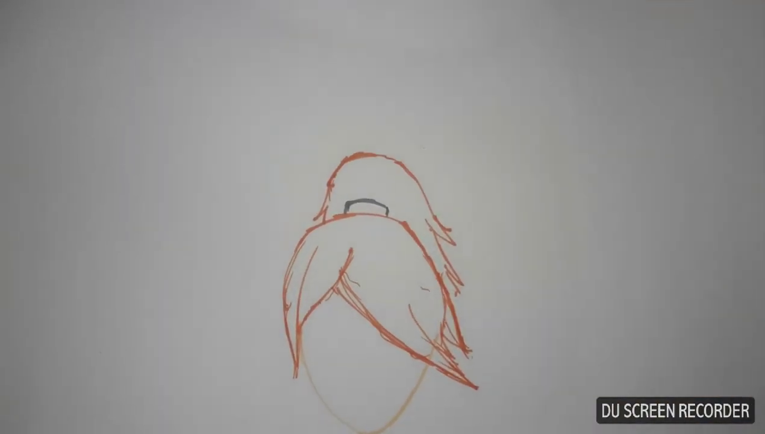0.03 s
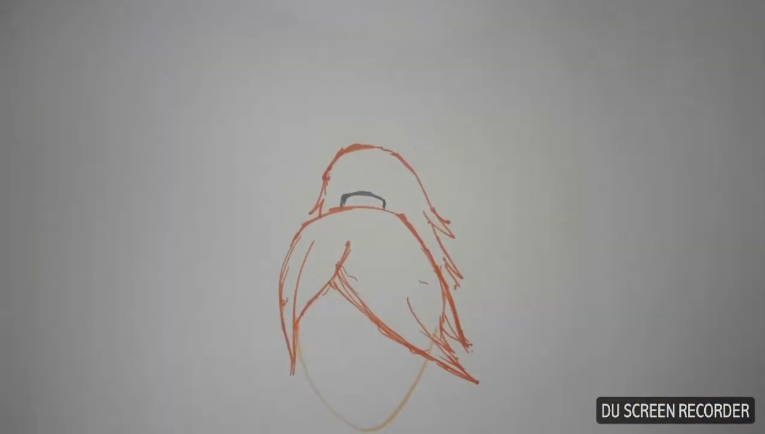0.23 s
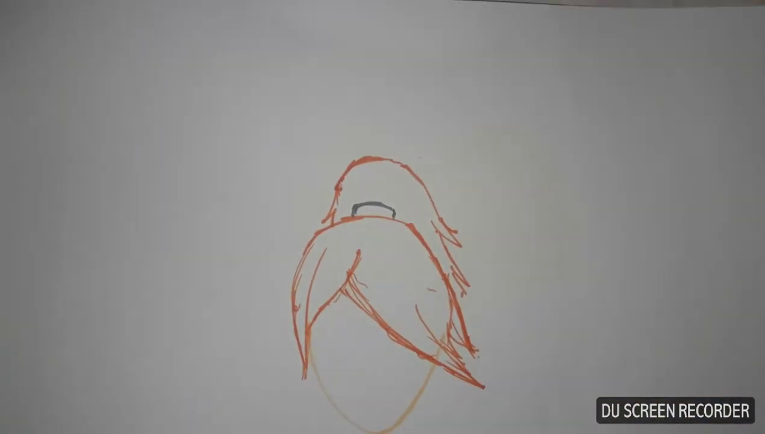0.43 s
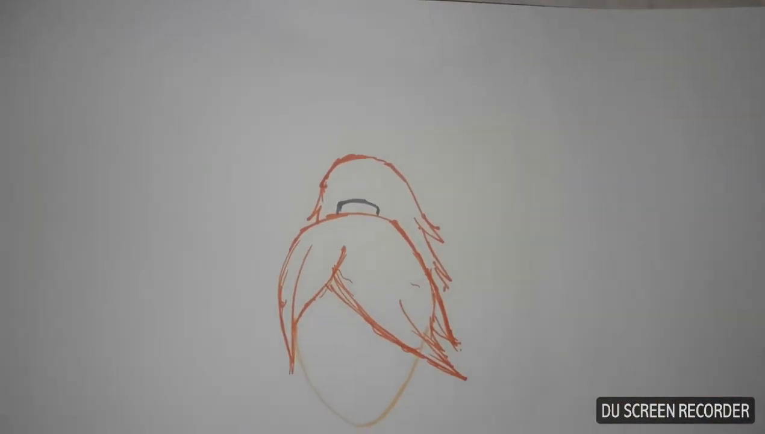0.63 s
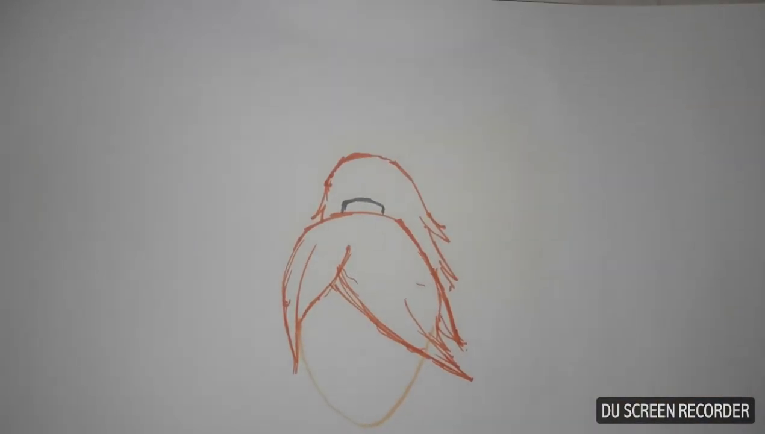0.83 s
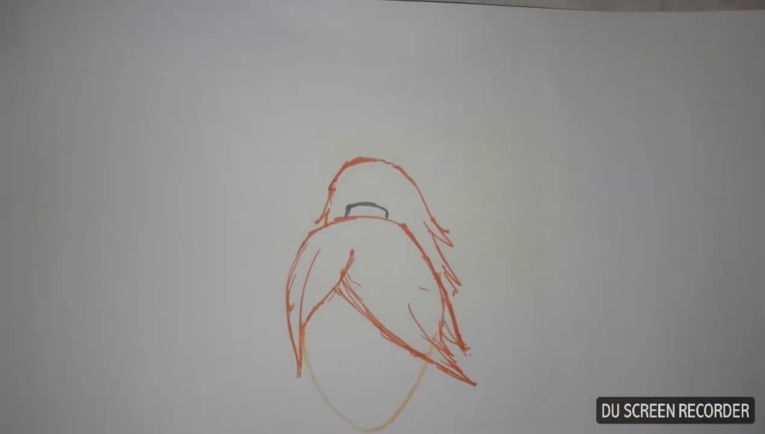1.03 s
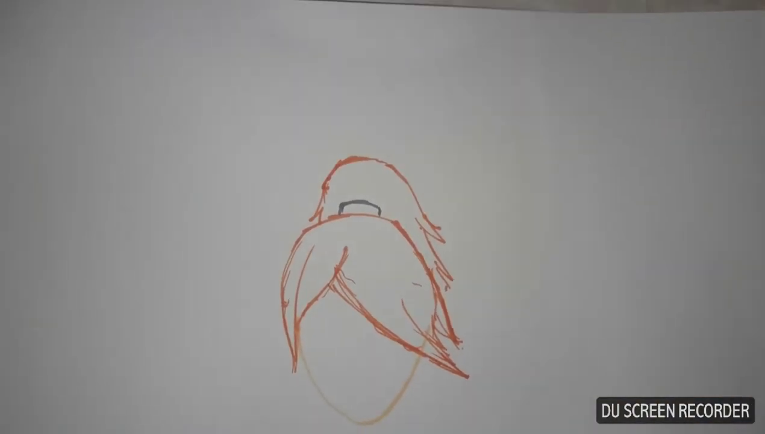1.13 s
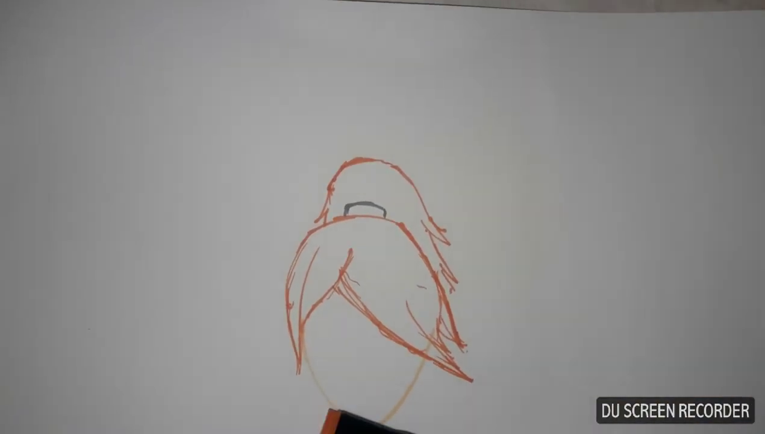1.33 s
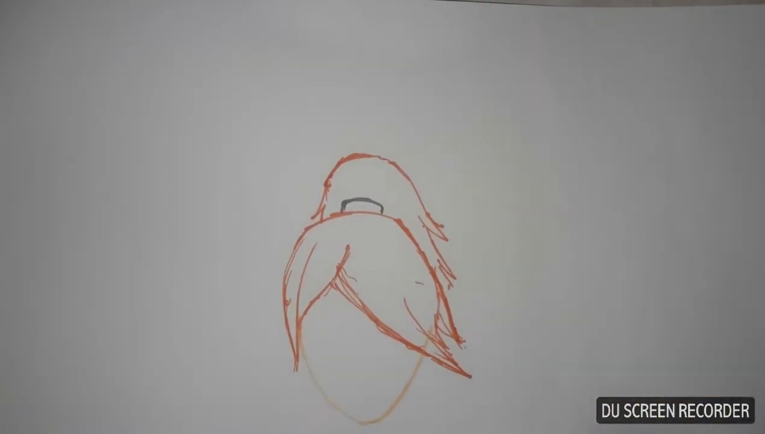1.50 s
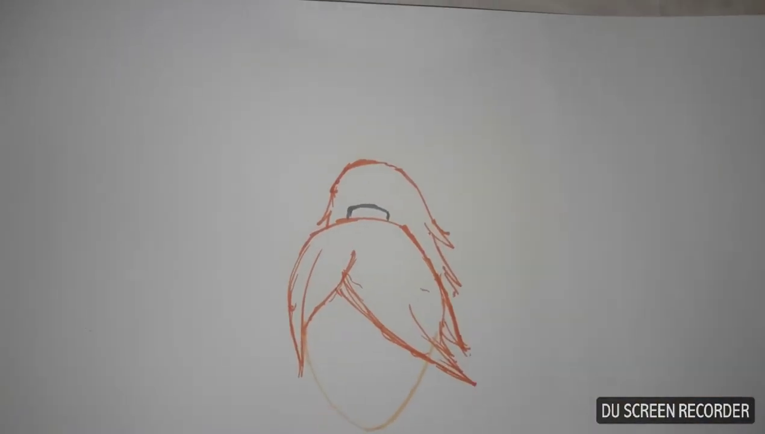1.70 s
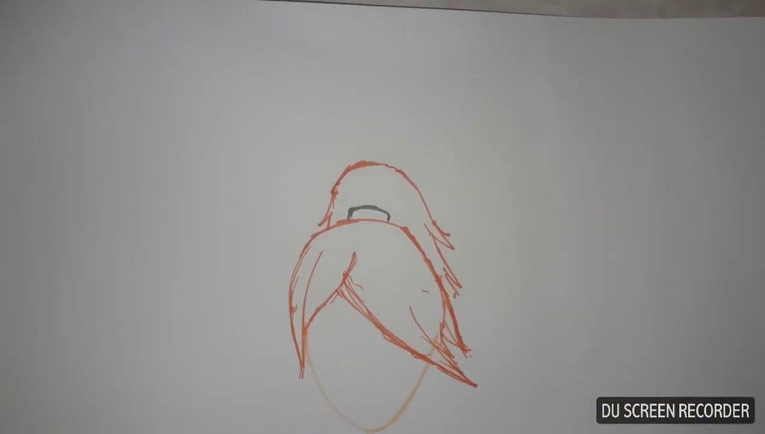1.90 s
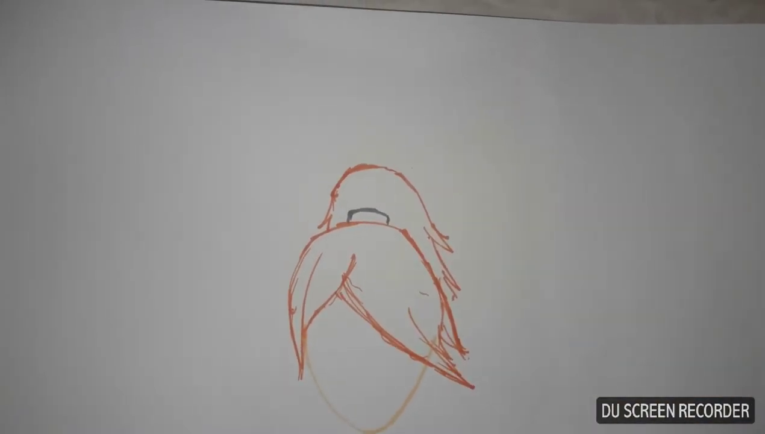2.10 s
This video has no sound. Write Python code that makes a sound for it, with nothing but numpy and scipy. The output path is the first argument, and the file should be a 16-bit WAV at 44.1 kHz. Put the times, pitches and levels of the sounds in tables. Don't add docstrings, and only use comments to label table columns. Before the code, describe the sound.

A small plastic part is handled close to a phone microphone at a desk. A soft tick at 0.12 s, then a loud, bright snap with a tiny rattle and desk thud at 0.24 s, ringing briefly in a small room. Background fan hiss dips, then recovers by 1 s. Two quieter knocks at 1.15 and 1.18 s, a tiny click at 1.23 s, and faint finger rubs and crackles throughout.

```python
import sys
import numpy as np
from scipy import signal
from scipy.io import wavfile
from scipy.ndimage import uniform_filter1d

SR = 44100
rng = np.random.default_rng(int(sys.argv[2]) if len(sys.argv) > 2 else 0)


def convert_level_to_amplitude(level_db):
    exponent = np.asarray(level_db, float) / 20
    return 10 ** exponent


def materialize(psi):
    bounded = np.clip(np.atleast_2d(psi).T, -1, 1)
    quanta = np.round(bounded * 32767).astype(np.int16)
    wavfile.write(sys.argv[1], SR, quanta)


N = 94815
EDGE_HZ = 16300


def evened(x):
    return x / np.sqrt(np.mean(x ** 2) + 1e-20)


def read(points, hz):
    f, value = np.transpose(points)
    return np.interp(np.log(hz + 1), np.log(f + 1), value)


def add(mix, s, sound):
    part = mix[round(s * SR):][:len(sound)]
    part += sound[:len(part)]


def ring(hz, width, rise_s=0.00012):
    t = np.arange(2000) / SR
    return (1 - np.exp(-t / rise_s)) * np.exp(-np.pi * width * t) * np.sin(2 * np.pi * hz * t)


# (time [s], level [dB], brightest pitch [Hz])
TICK_HITS = [
    (0.1186, -24, 8000),
    (0.1236, -37, 9000),
    (.1246, -37, 10000),
    (.1300, -48, 10000),
]
SNAP_HITS = [(.2360, -62, 11500), (.2382, -10, 7440), (.2386, -4, 7450), (.2387, -4, 14800),
             (0.2396, -14, 11000), (0.2406, -12, 5940), (.2412, -10, 4000), (0.2416, -10, 10500),
             (0.243, -18, 6000), (.2446, -11, 4400), (0.2476, -13, 12000), (0.2486, -12, 2700),
             (0.25, -18, 4000), (0.2547, -24, 4960), (.2580, -25, 9000), (.2592, -24, 2010),
             (.2650, -30, 6000), (.2742, -27, 6800), (.2747, -27, 13000), (.2456, -19, 2400),
             (.2620, -29, 3200)]
KNOCK_HITS = [
    (1.1455, -26, 9000),
    (1.1463, -28, 4000),
    (1.1470, -31, 1200),
    (1.1510, -42, 9000),
    (1.1488, -33, 2000),
]
REKNOCK_HITS = [
    (1.1765, -24, 8000),
    (1.1776, -25, 3700),
    (1.1786, -29, 1100),
    (1.1799, -28, 2500),
    (1.1805, -48, 12000),
]
# (pitch [Hz], width [Hz], level [dB])
TICK_RING = [(2360, 170, 7), (2900, 573, -2), (7900, 500, -14), (9340, 290, -10.5), (10700, 440, -1),
             (12900, 350, -13), (14600, 930, -1)]
SNAP_RING = [(780, 300, -16), (1200, 300, -31), (1700, 304, -13), (2350, 250, -16), (3100, 200, -10),
             (3830, 230, -5), (4550, 300, -11.5), (5820, 490, -7), (6950, 400, -2.5), (7480, 400, -2.5),
             (8800, 570, -8), (10300, 800, 1), (12500, 700, -6.5), (14680, 900, -4)]
KNOCK_RING = [(800, 350, -14), (1700, 340, -3), (2400, 460, -7), (4050, 250, 1), (5200, 680, -3),
              (6400, 900, -4), (9400, 1200, -19), (12800, 1200, 3), (14800, 1100, -6)]
REKNOCK_RING = [(550, 250, -16), (1100, 220, -9), (1750, 300, -4), (2500, 500, -5), (3700, 220, -1),
                (4860, 630, 0), (7300, 700, -10), (8780, 700, -29), (11500, 910, 1), (14000, 900, 1)]
# (crack level [dB], desk level [dB], room level [dB], rise [s] if unusual)
BALANCE = [
    (-12, -15, -19, .0004),
    (-1, -7, -7),
    (-3, -7, -14),
    (-3, -8, -15),
]


def small_part():
    hits = (TICK_HITS, SNAP_HITS, KNOCK_HITS, REKNOCK_HITS)
    rings = (TICK_RING, SNAP_RING, KNOCK_RING, REKNOCK_RING)
    return sum(contacts(*group) for group in zip(hits, rings, BALANCE))


RISE_S, CRACK_S = .00012, 0.00038
CRACK_SPREAD = 1.3
FOCUS_DB_PER_OCT2 = 3.5
ANSWER_DB, ANSWER_TOP = 9, 2.5


def contacts(rows, modes, levels):
    crack_db, desk_db, room_db, rise_s = (*levels, RISE_S)[:4]
    out, blows, t = np.zeros(N), np.zeros((2, N)), np.arange(256) / SR
    impulse = (t == 0).astype(float)
    luck = rng.standard_normal((len(rows), len(modes), 2))
    noise = rng.standard_normal((len(rows), 256))
    for k, (s, db, bright_hz) in enumerate(rows):
        for (hz, width, mode_db), (sign, tune) in zip(modes, luck[k]):
            octaves_squared = min(np.log2(hz / bright_hz) ** 2, 3)
            level = convert_level_to_amplitude(db + mode_db - FOCUS_DB_PER_OCT2 * octaves_squared)
            add(out, s, np.sign(sign) * level * ring(hz * (1 + 0.0096 * tune), width, rise_s))
        crack = convert_level_to_amplitude(db) * noise[k] * np.exp(-t / CRACK_S)
        edges = [bright_hz / CRACK_SPREAD, min(bright_hz * CRACK_SPREAD, EDGE_HZ)]
        add(out, s, convert_level_to_amplitude(crack_db) * signal.lfilter(*signal.butter(1, edges, "band", fs=SR), crack))
        dull = signal.butter(1, min(bright_hz * ANSWER_TOP, EDGE_HZ), fs=SR)
        add(blows[k % 2], s, convert_level_to_amplitude(db + ANSWER_DB) * signal.lfilter(*dull, impulse))
    for spot in blows:
        answer = desk_and_room(desk_db, room_db)
        out = out + below_edge(signal.fftconvolve(spot, answer)[:N])
    return out


# (time [s], level [dB], pitch [Hz], width [Hz])
THUDS = [(.1235, -43, 400, 60), (.2380, -19, 540, 330), (.2381, -22, 310, 70), (.2383, -18, 396, 85),
         (.2450, -31, 200, 60), (.2570, -22, 395, 90), (.2573, -25, 520, 170), (.2600, -33, 305, 35),
         (.2720, -41, 400, 30), (1.1456, -37, 400, 60), (1.1462, -43, 600, 200), (1.1768, -36, 380, 70),
         (1.1764, -39, 560, 200)]


def thuds():
    out = np.zeros(N)
    for s, db, hz, width in THUDS:
        add(out, s, convert_level_to_amplitude(db) * ring(hz, width, rise_s=.0006))
    return out


# (pitch [Hz], time [s])
ROOM_T60 = [(150, .2), (500, .18), (2000, .17), (6000, .16), (15000, .13)]
# (pitch [Hz], level [dB])
ROOM_COLOUR = [(80, -25), (200, -1), (380, 5), (800, -1), (1500, -4), (3000, 0), (4800, -4), (8000, -2),
               (12000, -7), (16000, -8)]
DESK_COLOUR = [(100, -39), (250, -12), (400, -6), (1000, -10), (2200, -2), (3800, 3.5), (8000, -9),
               (15000, -13)]
DESK_T60 = 0.047


def desk_and_room(desk_db, room_db):
    desk = tail(DESK_COLOUR, [(100, 10)])
    desk = desk * convert_level_to_amplitude(-60 * np.arange(SR // 2) / SR / DESK_T60)
    return convert_level_to_amplitude(room_db) * tail(ROOM_COLOUR, ROOM_T60) + convert_level_to_amplitude(desk_db) * desk / np.linalg.norm(desk)


def tail(colour, t60):
    hz, t, z = signal.stft(rng.standard_normal(SR // 2), SR, nperseg=256)
    z = z * convert_level_to_amplitude(read(colour, hz)[:, None] - 60 * t / read(t60, hz)[:, None])
    x = signal.istft(z, SR, nperseg=256)[1][:SR // 2]
    x = x * np.minimum(np.arange(len(x)) / (.001 * SR), 1)
    return x / np.linalg.norm(x)


# (time [s], length [s], level [dB], first pitch [Hz], last pitch [Hz], width [Hz])
RUBS = [
    (0.661, 0.028, -52.5, 11000, 9500, 6000),
    (0.574, 0.082, -60.5, 9400, 8000, 5000),
    (1.44, .16, -63, 6500, 10500, 2200),
    (2.5, 0.032, -52, 13000, 9300, 5000),
]


def rubs():
    out = np.zeros(N)
    for start, length, db, from_hz, to_hz, width in RUBS:
        u = np.linspace(0, 1, round(length * SR))
        glide_hz = from_hz + (to_hz - from_hz) * u
        turn = np.exp(2j * np.pi * np.cumsum(glide_hz) / SR)
        r = np.exp(-np.pi * width / SR)
        noise = rng.standard_normal(12000)[:len(u)]
        band = (turn * signal.lfilter([1], [1, -2 * r, r * r], noise / turn)).real
        add(out, start, convert_level_to_amplitude(db) * np.sin(np.pi * u ** 0.5) ** .8 * evened(band))
    return out


# (time [s], level [dB])
HANDLING = [(0, 0), (.3, 4), (.5, 5), (.65, 6), (0.741, -2), (0.831, 5.5), (0.951, 5.5), (1.3, 4), (1.5, 3),
            (1.56, 9.5), (1.65, 3.5), (1.73, -5), (1.8, 4.5), (1.99, 3), (2.03, 7.5), (2.15, 0)]
# (time [s], level [dB], pitch [Hz])
CRACKS = [(.6655, -54, 13500), (.799, -53, 11500), (.829, -58, 12000), (.843, -57, 12000),
          (.889, -56, 12500), (.916, -54, 10500), (.917, -52, 3000), (.956, -57, 12000), (.989, -51, 2800),
          (1.424, -47, 4000), (1.582, -54, 12000), (1.688, -56, 12000), (1.895, -56, 12000)]
# (time [s], level [dB], pitch [Hz])
BOUNCES = [
    (1.1588, -50, 11000),
    (1.1713, -46, 4500),
    (1.1715, -50, 10000),
    (1.218, -52, 10000),
    (1.2322, -40, 4700),
    (1.2322, -41, 14500),
    (1.2324, -50, 8000),
    (1.2322, -50, 11500),
]
CRACKLE_PER_S, CRACKLE_HZ, CRACKLE_DB = 140, 9220, -69


def crackle():
    size = convert_level_to_amplitude(1.9 * np.minimum(rng.exponential(1, N), 2)) * (rng.random(N) < CRACKLE_PER_S / SR)
    puffs = .35 + signal.oaconvolve(size, np.exp(-np.arange(400) / (.002 * SR)))[:N]
    treble = signal.butter(6, CRACKLE_HZ, "high", fs=SR, output="sos")
    out = evened(signal.sosfilt(treble, puffs * rng.standard_normal(N)))
    out = out * convert_level_to_amplitude(CRACKLE_DB + np.interp(np.arange(N) / SR, *np.transpose(HANDLING)))
    for s, db, hz in CRACKS + BOUNCES:
        tick = ring(hz, .05 * hz + 350, rise_s=.0003)
        add(out, s, convert_level_to_amplitude(db) * tick / tick.max())
    return out


# (pitch [Hz], level per Hz [dB])
FAN = [(40, -41.5), (100, -36.5), (180, -22), (210, -5), (500, -10.5), (850, -19), (1500, -13), (2300, -23)]
AIR = [(800, -40), (2300, -18), (3100, -20), (3900, -28), (5900, -35), (8900, -36.5), (9800, -35),
       (15500, -33.5)]
# (pitch [Hz], width [Hz], level [dB])
CASE = [(397.5, 184.5, -4), (1900, 300, -10), (4640, 550, -15.5), (7000, 910, -25.5), (10000, 650, -33.5)]
# (pitch [Hz], level [dB])
HUM = [(200, -68), (300, -70), (395, -69.5)]
FAN_DB = -50.5


def fan():
    frames, hz = N // 256 + 5, np.fft.rfftfreq(1024, 1 / SR)
    a, b, patches = rng.standard_normal((frames, 513, 3)).T
    patches = evened(uniform_filter1d(uniform_filter1d(patches, size=16, axis=0), size=10, axis=1))
    swell = evened(uniform_filter1d(rng.standard_normal(frames), size=12))
    power = np.where(hz < 2300, convert_level_to_amplitude(read(FAN, hz)) ** 2, convert_level_to_amplitude(read(AIR, hz)) ** 2)
    for f, width, db in CASE:
        power = power + convert_level_to_amplitude(db) ** 2 * np.exp(-((hz - f) / width) ** 2 * 2)
    z = (a + 1j * b) * np.sqrt(power)[:, None] * convert_level_to_amplitude(0.92 * patches + 1.6 * swell)
    hiss = evened(signal.istft(z, nperseg=1024, noverlap=768)[1][:N])
    t, hum = np.arange(N) / SR, np.zeros(N)
    for f, db in HUM:
        waver_db = 1 + 1.6 * np.sin(2 * np.pi * (3.1 * t + rng.random()))
        hum += convert_level_to_amplitude(db + waver_db) * np.sin(2 * np.pi * (f * t + rng.random()))
    return convert_level_to_amplitude(FAN_DB) * hiss + hum


HISS_EDGE_HZ = 15650


def below_edge(x):
    return signal.oaconvolve(x, signal.firwin(601, HISS_EDGE_HZ, window=("kaiser", 9), fs=SR), "same")


# (pitch [Hz], level [dB])
SIDE_COLOUR = [(30, -20), (250, -40), (700, -23), (2000, -28), (5000, -26), (9000, -16), (15000, -23)]
SIDE_PATCH_DB = 5


def side_hiss(floor):
    hz, t, z = signal.stft(floor, SR, nperseg=1024)
    patches = uniform_filter1d(rng.standard_normal(z.shape), size=60, axis=0)
    patches = evened(uniform_filter1d(patches, size=4, axis=1))
    z = z * convert_level_to_amplitude(read(SIDE_COLOUR, hz)[:, None] + SIDE_PATCH_DB * patches)
    z = z * np.exp(2j * np.pi * rng.random(z.shape))
    return signal.istft(z, SR, nperseg=1024)[1][:N]


BLOW_LOW_HZ = 170


def scene():
    floor = below_edge(fan() + crackle() + rubs())
    blows = small_part() + thuds()
    bass_cut = signal.butter(3, BLOW_LOW_HZ, "high", fs=SR, output="sos")
    mid = floor + signal.sosfilt(bass_cut, blows)
    side = side_hiss(floor)
    return np.array([mid + side, mid - side])


# (time [s], level [dB])
GAIN = [(0, 0), (.17, 1.5), (.25, 0.5), (0.351, -3), (.5, -5), (.64, -6.5), (.76, -6), (.85, -3),
        (1.001, 0.5), (1.15, 2.5), (1.4, 0.5), (1.75, 0), (2.0, 0), (2.15, 3)]
MIC_LOW_HZ = 50.7


def top_cut(x):
    return signal.sosfilt(signal.butter(12, 16820, fs=SR, output="sos"), x)


# (time [s], level [dB])
GAIN = [(0, 0), (.17, 1.5), (.25, 0.5), (0.351, -3), (.5, -5), (.64, -6.5), (.76, -6), (.85, -3),
        (1.001, 0.5), (1.15, 2.5), (1.4, 0.5), (1.75, 0), (2.0, 0), (2.15, 3)]
MIC_LOW_HZ = 50.7


def record(dry):
    s, db = np.transpose(GAIN)
    bass_cut = signal.butter(2, MIC_LOW_HZ, "high", fs=SR, output="sos")
    x = signal.sosfilt(bass_cut, dry) * convert_level_to_amplitude(np.interp(np.arange(N) / SR, s, db))
    x = signal.oaconvolve(x, signal.firwin(301, EDGE_HZ, window=("kaiser", 8), fs=SR)[None], "same")
    return top_cut(x)


dry = scene()
out = record(dry)
materialize(out)
```